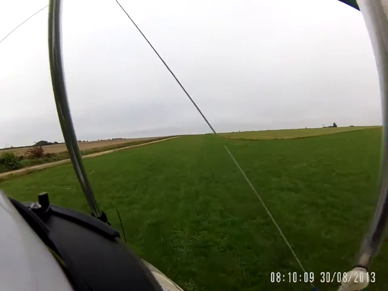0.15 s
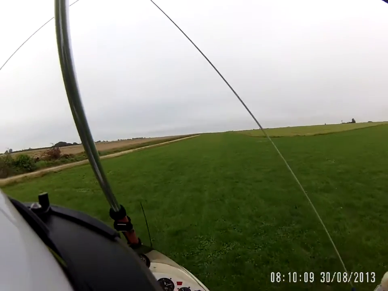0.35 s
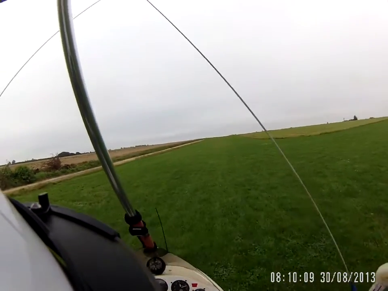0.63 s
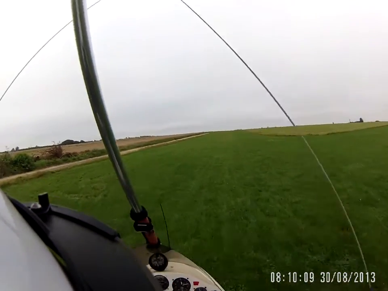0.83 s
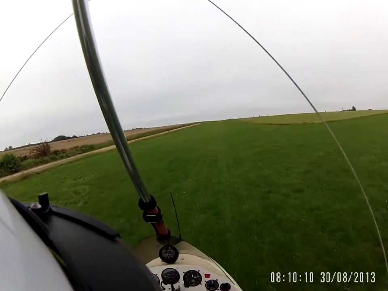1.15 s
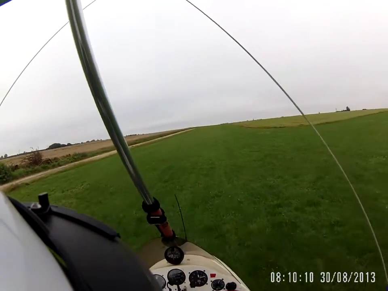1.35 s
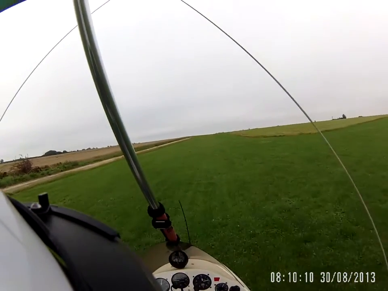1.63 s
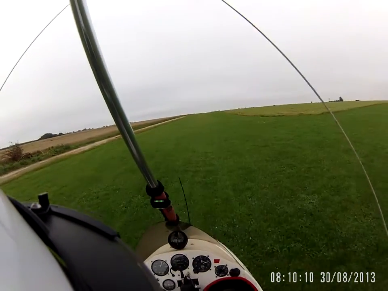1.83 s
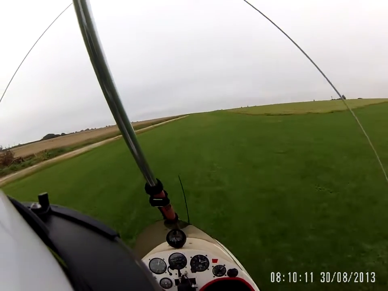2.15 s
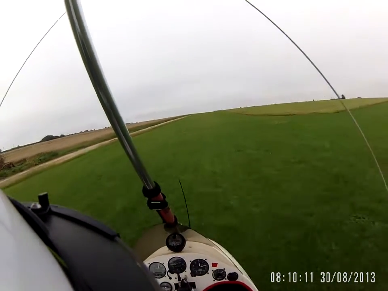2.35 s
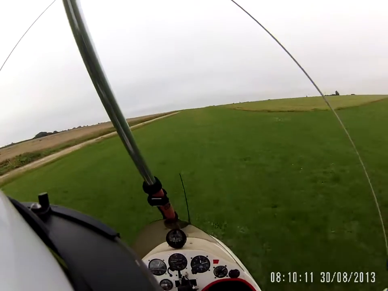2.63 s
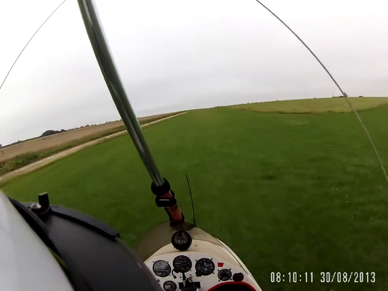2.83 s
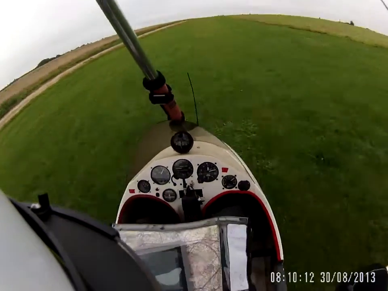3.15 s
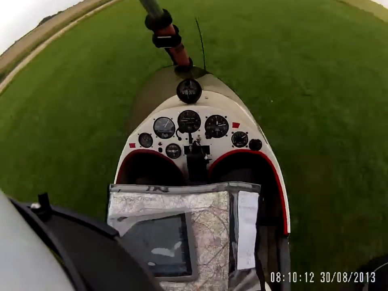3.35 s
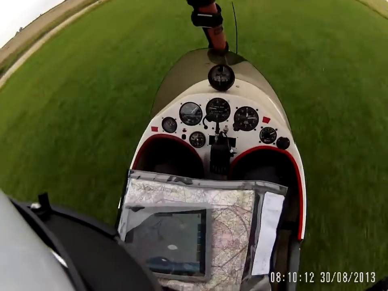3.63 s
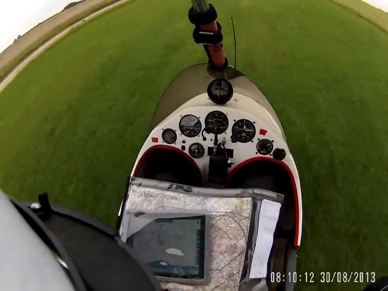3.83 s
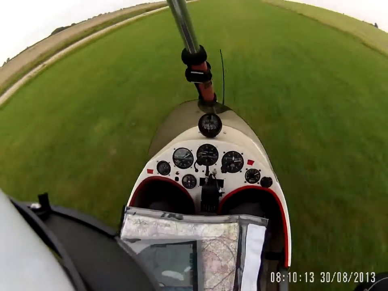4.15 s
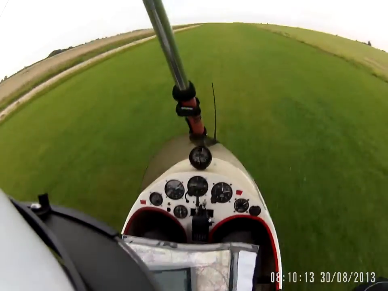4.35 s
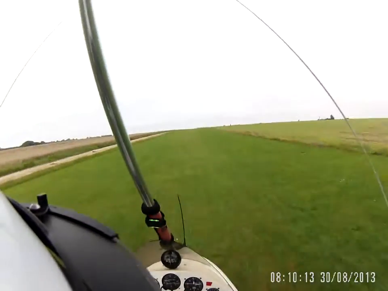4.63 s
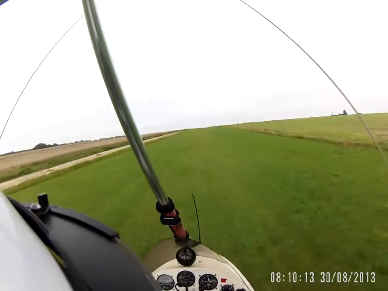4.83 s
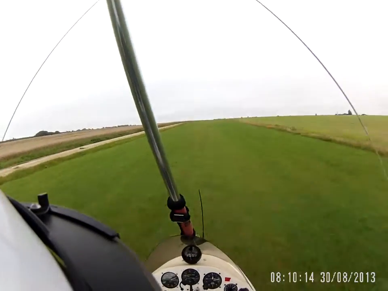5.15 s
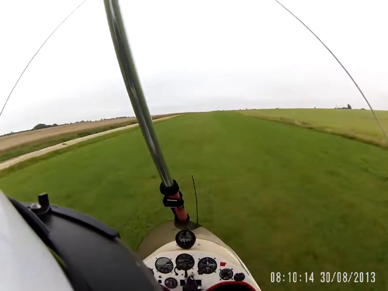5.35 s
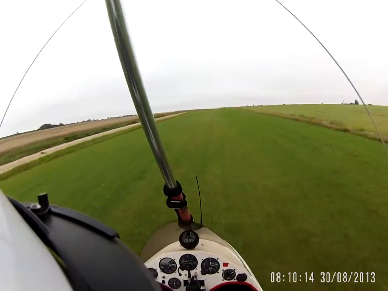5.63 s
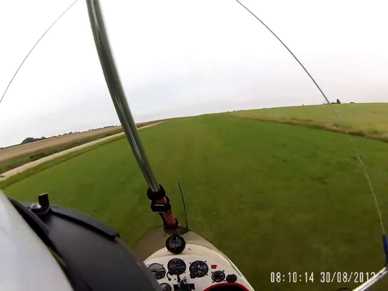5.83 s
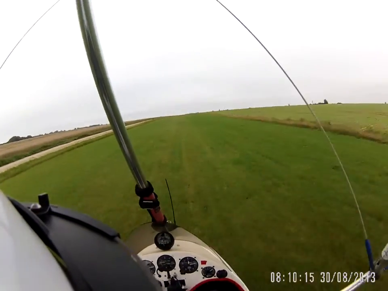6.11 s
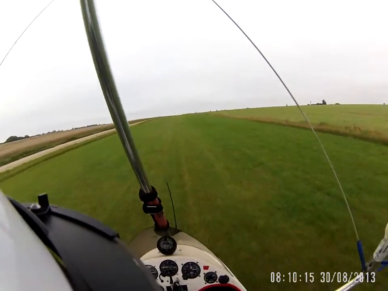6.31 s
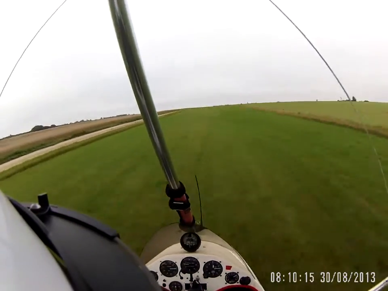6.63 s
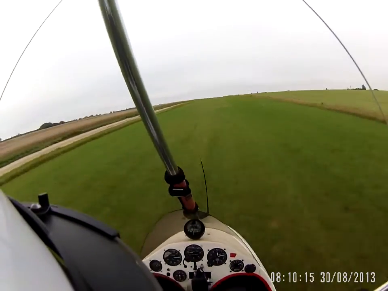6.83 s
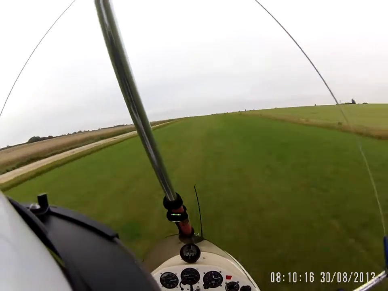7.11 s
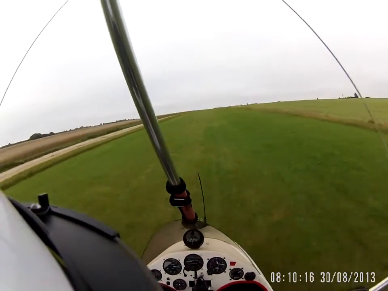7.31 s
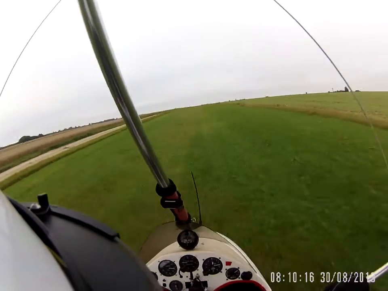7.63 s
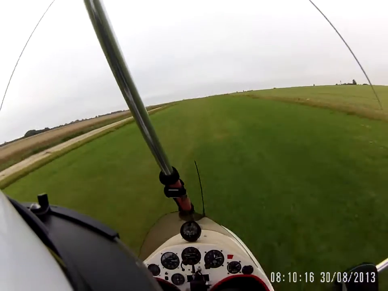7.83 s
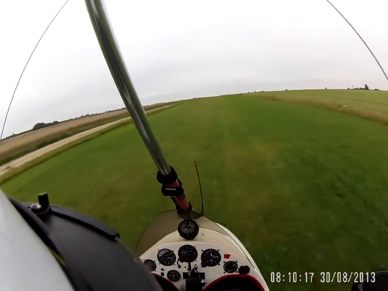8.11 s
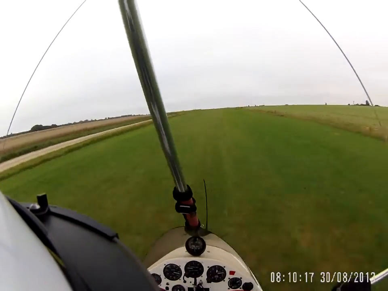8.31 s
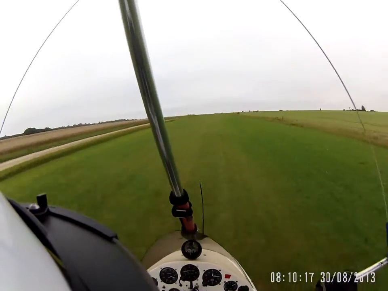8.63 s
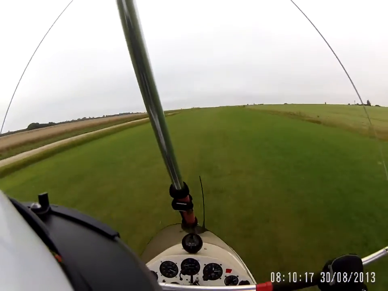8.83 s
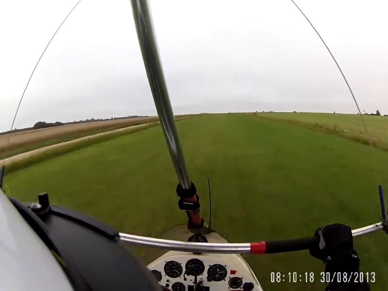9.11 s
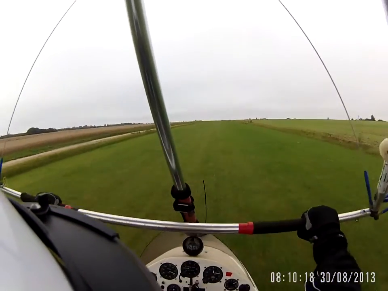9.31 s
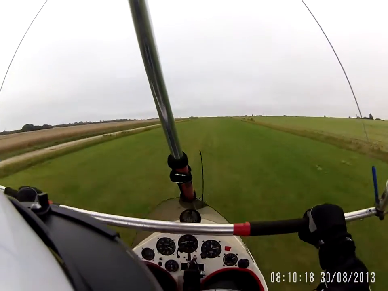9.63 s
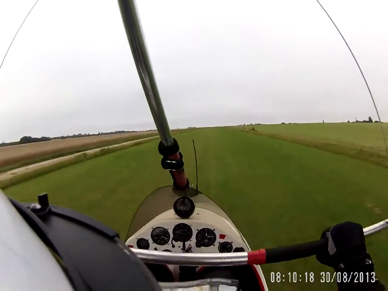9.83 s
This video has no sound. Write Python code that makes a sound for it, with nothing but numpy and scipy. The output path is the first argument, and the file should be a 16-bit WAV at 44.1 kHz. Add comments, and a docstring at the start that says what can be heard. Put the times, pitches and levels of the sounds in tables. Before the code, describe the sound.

A small two-stroke aircraft engine is heard close up from the pilot's helmet, outdoors and somewhat muffled. It runs at a fast idle for the first half second. The throttle then opens with a short bark, and pitch and loudness climb quickly, reaching full power at about 2 seconds. From there a loud, buzzing drone holds to the end at about 10 seconds, creeping only slightly higher. The propeller adds a rapid choppy flutter, a rushing wash and a light hiss, with a faint gear whine underneath. Between about 3 and 4.5 seconds the tone shifts a little, with less hiss and slightly more whine. Loose fittings give small bright ticks, one near 3 seconds and several between 6 and 8.5 seconds. From about 2 seconds, a low, gusty wind rumble builds as the aircraft gathers speed.

```python
"""A grass strip, heard from a pilot's helmet: a two-stroke twin goes from fast idle to full power.
The exhaust fires twice a turn, and a closed camera case muffles it above the low orders. A whining
gear pair drives a three-blade propeller that slaps the wake of the frame and hisses in puffs at the tips.
Frame tubes ring, loose fittings tick, and the wind rumble grows as the take-off roll gathers pace.
The balance shifts while the pilot looks down."""
import sys
import numpy as np
from scipy import signal
from scipy.fft import rfft, irfft, next_fast_len
from scipy.io import wavfile
from scipy.ndimage import uniform_filter1d, minimum_filter1d, map_coordinates

SR = 44100
rng = np.random.default_rng(int(sys.argv[2]) if len(sys.argv) > 2 else 0)


def file_out(sig):
    """Save sig as 16-bit WAV at sys.argv[1]."""
    # one column per channel
    cols = np.atleast_2d(sig).T
    # limit, then scale
    lim = np.clip(cols, -1, 1)
    pcm = np.round(lim * 32767).astype(np.int16)
    wavfile.write(sys.argv[1], SR, pcm)


N = 439236

GEAR_TEETH, PINION_TEETH, BLADE_COUNT = 59, 17, 3
IDLE_HZ, FULL_HZ = 55.5, 100  # crank speeds
ROLL_START_S = 2
CEILING, TOP_HZ = 0.9, 15270

# The rev-up. Each row: time in seconds, crank speed in Hz.
CRANK_SPEED = [(0.0, 56.6), (0.11, 55.1), (0.55, 55.94), (0.61, 56.8), (0.94, 75.92), (1.02, 79),
               (1.16, 83.8), (1.3, 88.25), (1.53, 93.66), (1.61, 95.3), (1.8, 96.55), (2.08, 97.86),
               (3.91, 99.28), (5.43, 100.4), (6.13, 101.0), (9.23, 101.6), (9.79, 101.3), (9.96, 101.4)]
# Two times in seconds: the throttle starts to open, is wide open.
THROTTLE_OPENS_S = [0.49, 1.0]
# Four times in seconds: the head starts down, is down, starts up, is up.
HEAD_DIP_S = [3.02, 3.14, 4.38, 4.62]
# Faders by layer, then by low crank order. Each row: idle level in dB, dB added by open throttle,
# by full revs and by looking down, dB added per second of the roll.
LAYER_FADERS = dict(weak=(-64, 12.5, 11, -1, -0.37), sides=(-68, 8, 5, 2, -0.18),
                beats=(-60.5, 8, 4.5, 0.5, 0.77), blade_tone=(-53, 11, 4, -0.5, .5),
                roar=(-38.5, 8.5, -1, 1.5, 0.76), rasp=(-48.5, 10, 4, -0.8, -0.17),
                hiss=(-59.5, 4.5, 11, -4.5, 0.02), edge=(-56, 5, 14, -5, -0.06),
                rumble=(-54.5, 3.5, 2.5, 0.5, 2.5), frame=(-83, 5, 18, -14, .05))
ORDER_FADERS = {2: (-38, 21, 2, .3, 0.4441), 3: (-54.5, 6, 13.5, -2, 0.4), 4: (-48, 15, 2.5, -1, 0.49),
                5: (-62.5, 28.5, 3.5, 1.5, -.1), 6: (-48, 23.5, 2, -1.5, -0.09), 7: (-58, 3.5, 30, 5, 0.4),
                8: (-53.5, 13, 3, -9, -14)}

# Tone colours. Each row: frequency in Hz, relative gain in dB.
RUMBLE_EQ = [(15, -32), (25, -1), (50, 4), (80, 5.5), (130, 2.5), (170, 5), (230, -17), (300, -43)]  # wind on the helmet
CHATTER_EQ = [(2300, -40), (2800, 0), (3400, -2), (4200, -2), (5000, -4), (6200, -30)]  # a loose fitting
ROAR_EQ = [(40, -50), (110, -6), (200, 1.5), (330, 3), (450, -2.5), (560, -13.5), (700, -7.5),
           (1000, -14.5), (1300, -46.5)]  # body of the gas and propeller wash
RASP_EQ = [(800, 0.5), (1000, -7), (1200, -4), (1350, 4), (1550, -7.5), (1900, -7), (2200, -11.5),
           (2700, -19), (3200, -41)]  # their midrange grit
SWISH_EQ = [(1410, -30), (2400, -12.5), (2740, -4), (3220, -1.5), (3550, -3.5), (3820, -2), (4400, -3.5),
            (4890, 3), (5700, -4), (6070, 0.5), (7200, -8), (9360, -39), (15800, -120)]  # body of the tip hiss
SIZZLE_EQ = [(4240, -61), (7200, -9.5), (7780, -2), (8530, -3), (9310, 3.5), (9960, 4), (11200, 1),
             (11900, 1), (12500, -2.5), (13000, -6), (13400, -5), (13900, -17), (14500, -29), (15200, -39)]  # top of the tip hiss, and the ticks
SLAP_EQ = [(20, -61), (110, -23), (190, -5.5), (260, -1), (340, -4.5), (430, 3), (520, -2.5), (600, -9),
           (690, -9), (800, -13.5), (950, -21), (1100, -20.5), (1300, -33), (3000, -56), (9000, -83)]  # a blade hitting the wake
CASE_EQ = [(50, -20), (330, 25), (440, 21), (500, 13), (560, 13), (680, -3.5), (1000, -2.5), (1500, -19),
           (2000, -26), (2700, -16)]  # what the closed case lets through
PIPE_EQ = [(105, -5), (150, -2.5), (200, 2), (250, -3.5), (272, 5), (292, 14), (320, 5.5), (345, -1.5),
           (372, -4.5), (400, 5), (435, 7), (470, 9.5), (500, 5.5), (530, 3.5), (560, 7), (600, 2.5),
           (640, -5), (800, -35)]  # resonances the low orders climb through

# Level rides. Each row: time in seconds, added level in dB.
GUSTS = [(0, -4), (1.05, .5), (1.3, -8), (2, 3), (3.4, -3), (3.7, 6), (4, 1.5), (5, 4), (5.2, 0), (5.5, 5),
         (6.2, 5), (7.6, 0.5), (8.2, 1.5), (8.7, -2), (9.3, 1), (9.96, -5)]  # gusts and lulls in the rumble
HISS_SWELLS = [(0, 0), (1.5, 2), (2.9, 0.3), (4.6, 0.5), (6.3, -0.5), (7.8, -3), (8.6, -2), (9.4, -5),
               (9.96, -5.5)]  # the tip hiss swells and fades
SLAP_FLARES = [(1.66, -2.5), (2.12, 2), (2.2, 2.5), (2.32, 8), (2.41, 1), (2.5, 3.5), (2.62, 0), (3.11, 7)]  # peaks of brief flares in the blade slap
THROTTLE_BARK = [(.52, -7), (.6, 13.5), (.8, 12.5), (.95, -12.5)]  # orders 7 and 8 bark as the throttle opens

# Rings of the metal frame. Each row: pitch in Hz, width in Hz, relative level in dB.
FRAME_RINGS = [(3130, 35, -3), (3250, 35, 0), (3830, 45, -5), (4250, 35, -6), (6060, 70, -2)]
# Loose fittings. Each row: start in seconds, relative level in dB.
TICK_CUES = [(0.2428, -26), (0.3718, -30), (0.5576, -23), (0.688, -40), (1.434, -17), (2.9981, -10),
             (6.379, -10), (6.5168, -13), (6.6911, -6), (7.214, -11), (7.7022, -11), (8.0265, -14),
             (8.485, -15)]
CHATTER_CUES = [(5.82, -46), (6.08, -49), (6.21, -54), (8.98, -46)]
# Gear whine. Each row: time in seconds, level in dB.
WHINE_RIDE = [(0, -59), (.5, -56.5), (.85, -68), (1.7, -49), (2, -48), (2.95, -47.5), (3.15, -40.5),
              (4.4, -41.5), (4.65, -54), (5, -45), (5.6, -55), (7.1, -46.5), (9.3, -54), (9.96, -45)]
# Gear sidebands: offsets from the whine in blade rates, then their relative levels in dB.
SIDEBANDS = [-2, -1, 1, 2, 3, 4]
SIDEBAND_DB = [0.5, 4, 1, -1, -12.5, -1.5]
# Relative puff strength in dB, one for each blade tip.
TIP_PUFF_DB = [5.3, -1.2, -19]
# Propeller. Each row: time in seconds, slap level before flares in dB, second harmonic level in dB.
PROPELLER_RIDE = [(0, -34.5, -55), (.6, -46.5, -60), (1, -21.5, -42), (1.5, -20, -33), (2.6, -21.5, -26.5),
                  (3.3, -26.5, -39), (4.3, -23, -32), (6.3, -27.5, -42), (7.7, -24.5, -32),
                  (8.5, -27.5, -45), (9.96, -30, -34)]
# Two low orders trade strength. Each row: time in seconds, dB added to order 4, dB added to order 5.
ORDER_TRADE = [(4.4, 0, 0), (5.6, 1, -3), (7, 1.5, -3.5), (8.3, .3, -2.5), (9.2, 3, 2.5), (9.96, -2, -2)]
# Exhaust overtones. Each row: time in seconds, levels of orders 10, 13 and 26 in dB.
UPPER_ORDER_RIDE = [(0, -45, -68, -74), (.55, -44, -65, -72), (.75, -52, -54, -80), (1.05, -40, -61, -72),
                    (1.5, -48, -57, -70), (3.3, -46, -60, -66.5), (3.8, -48, -61, -64),
                    (4.3, -47, -52, -53), (4.8, -48, -60, -65), (5.5, -54, -54, -69), (7.7, -54, -44, -68),
                    (9.198, -52, -53, -67), (9.96, -53, -61, -71)]
# Faint exhaust overtones: crank orders, then their relative levels in dB.
WEAK_ORDERS = [1, 9, 11, 12, 14, 15, 16, 18, 19, 20, 21, 22, 23, 24, 25]
WEAK_ORDER_DB = [-5, 1, -2.5, 1.5, 0.5, -7, -23, -11, -13, -19, 0.5, 3, -1.5, 1.5, -7]
# Faint in-between tones. Each row: crank order, blade rates added. Then their relative levels in dB.
BETWEEN_TONES = [(3, -1), (4, -1), (5, -1), (5, 1)]
BETWEEN_DB = [0, 3.5, -5, 4]
# Level sway in dB for each low crank order.
ORDER_SWAY_DB = {2: 0.25, 3: 0.72, 4: 0.33, 5: 0.97, 6: 0.79, 7: 2.3, 8: 1.6}


def amp(db):
    return 10 ** (np.asarray(db) / 20)


def unit_rms(x):
    return x / np.sqrt(np.mean(x ** 2) + 1e-20)


def eq_db(eq, hz):
    """The gain of an EQ curve at hz, read on a log frequency axis."""
    freqs, gains = np.transpose(eq)
    return np.interp(np.log(hz + 1), np.log(freqs + 1), gains)


def rides(rows):
    """One automation curve for each column after the time."""
    times, *columns = np.transpose(rows)
    return [np.interp(np.arange(N) / SR, times, column) for column in columns]


def wobble(rate):
    """A gliding random curve, rate knots a second."""
    knots = rng.standard_normal(int(N * rate / SR) + 4)
    return map_coordinates(knots, [np.arange(N) * rate / SR], order=1)


def coloured(x, eq):
    """x through an EQ curve, brought to rms 1."""
    size = next_fast_len(N + SR // 4)
    gain = amp(eq_db(eq, np.fft.rfftfreq(size, 1 / SR)))
    return unit_rms(irfft(rfft(x, size) * gain, size)[:N])


def patchy_noise(depth_db):
    """White noise with louder and softer patches in time and frequency."""
    spectra = signal.stft(rng.standard_normal(N + 512), nperseg=512)[2]
    patches = uniform_filter1d(rng.standard_normal(spectra.shape), 6, axis=0)
    patches = uniform_filter1d(patches, 8, axis=1)
    return signal.istft(spectra * amp(depth_db * unit_rms(patches)), nperseg=512)[1][:N]


def tone(turns, db, sway_db=1.8, drift_rad=0.4, rate=6):
    """A sine around rms level db, wandering in level and phase."""
    peak = np.sqrt(2) * amp(db + sway_db * wobble(rate))
    return peak * np.sin(2 * np.pi * turns + drift_rad * wobble(rate))


def wind(db):
    """The low bed: wind buffets the helmet in gusts and lulls."""
    buffeting = amp(1.5 * wobble(14)) * rng.standard_normal(N)
    return amp(db + rides(GUSTS)[0]) * coloured(buffeting, RUMBLE_EQ)


def frame_ring(ring_db):
    """The shaken tubes ring in narrow bands that fade in and out."""
    size = next_fast_len(N)
    freqs = np.fft.rfftfreq(size, 1 / SR)
    shake = rfft(rng.standard_normal(N), size)
    rings = np.zeros(N)
    for hz, width, db in FRAME_RINGS:
        resonance = width ** 2 / (width ** 2 + (2 * (freqs - hz)) ** 2)
        rings += amp(ring_db + db + 2.2 * wobble(6)) * unit_rms(irfft(shake * resonance, size)[:N])
    return rings


def rattle():
    """Loose fittings give short bright ticks and longer bursts of chatter."""
    tick_env, chatter_env = np.zeros((2, N + SR))
    t = np.arange(SR // 10) / SR
    tick = (1 - np.exp(-t / 0.00051)) * amp(-9.5 - 60 * t / 0.011)  # dies 60 dB in 11 ms
    burst = np.sin(np.pi * t / 0.12)
    for start, db in TICK_CUES:
        tick_env[round(start * SR):][:len(t)] = amp(db) * tick
    for start, db in CHATTER_CUES:
        chatter_env[round(start * SR):][:len(t)] = amp(db) * burst
    ticks = tick_env[:N] * coloured(rng.standard_normal(N), SIZZLE_EQ)
    return ticks + chatter_env[:N] * coloured(rng.standard_normal(N), CHATTER_EQ)


def wash(crank, roar_db, rasp_db):
    """Rushing gas and propeller wash: a smooth roar, and a rasp that pulses lightly with each firing."""
    roar = coloured(rng.standard_normal(N), ROAR_EQ)
    rasp = coloured(amp(0.5 * np.cos(4 * np.pi * crank)) * patchy_noise(depth_db=1), RASP_EQ)
    return amp(roar_db) * roar + amp(rasp_db) * rasp


def tip_hiss(crank, blades, swish_db, sizzle_db):
    """Each passing blade tip adds a puff to a steady hiss; the top end puffs hardest."""
    passes = blades.astype(int)
    scatter_db = 1.1 * rng.standard_normal(passes[-1] + 1)
    puff_db = np.array(TIP_PUFF_DB)[passes % BLADE_COUNT] + scatter_db[passes]
    puffs = amp(puff_db) * np.sin(np.pi * blades) ** 4
    jet = amp(0.7 * np.cos(4 * np.pi * crank)) * patchy_noise(depth_db=0.7)
    swish = amp(swish_db) * coloured((4.46 + puffs) * jet, SWISH_EQ)
    sizzle = amp(sizzle_db + 0.32 * wobble(32)) * coloured((2.46 + puffs) * jet, SIZZLE_EQ)
    return amp(rides(HISS_SWELLS)[0]) * (swish + sizzle)


def gearbox(crank, blades, sideband_db):
    """Meshing teeth whine; the pulsing blade load spreads sidebands around the note."""
    mesh = PINION_TEETH * crank
    sidebands = sum(tone(mesh + offset * blades, sideband_db + db, sway_db=4, drift_rad=1)
                    for offset, db in zip(SIDEBANDS, SIDEBAND_DB))
    return sidebands + tone(mesh, rides(WHINE_RIDE)[0], sway_db=0.6, drift_rad=0.25, rate=8)


def propeller(blades, hum_db, flare_db):
    """Over a hum, each blade slaps the wake of the frame; eddies sway the slaps in force and timing."""
    slap_db, second_db = rides(PROPELLER_RIDE)
    passes = np.searchsorted(blades, np.arange(1, int(blades[-1])))
    time_jitter, force_jitter = rng.standard_normal((len(passes), 2)).T
    late_s = 0.00017 * time_jitter + 0.00027 * wobble(22)[passes]
    force_db = 2.9 * force_jitter + 2.8 * wobble(16)[passes]
    hits = np.clip(passes + np.round(late_s * SR).astype(int), 0, N - 1)
    slaps = coloured(np.bincount(hits, amp(force_db), N), SLAP_EQ)
    hum = tone(blades, hum_db, sway_db=1.2, drift_rad=0.24, rate=6.1)
    hum += tone(2 * blades, second_db, sway_db=1.5, drift_rad=0.58, rate=8)
    return amp(slap_db + flare_db) * slaps + hum


def exhaust_buzz(crank_hz, crank, blades, weak_db, between_db):
    """Exhaust overtones pass the case unevenly; faint tones sit one blade rate off orders 3 to 5."""
    upper = sum(tone(order * crank, db) for order, db in zip((10, 13, 26), rides(UPPER_ORDER_RIDE)))
    weak = sum(tone(order * crank, weak_db + db + eq_db(CASE_EQ, order * crank_hz))
               for order, db in zip(WEAK_ORDERS, WEAK_ORDER_DB))
    between = sum(tone(order * crank + offset * blades, between_db + db)
                  for (order, offset), db in zip(BETWEEN_TONES, BETWEEN_DB))
    return upper + weak + between


def exhaust_drone(crank_hz, crank, drive, flare_db):
    """Two firings a turn: clean low orders climb through the pipe's resonances as the revs rise."""
    fourth_db, fifth_db = rides(ORDER_TRADE)
    bark_db = rides(THROTTLE_BARK)[0]
    duck_db = -0.53 * flare_db  # order 6 ducks when the slaps flare
    added_db = {4: fourth_db, 5: fifth_db, 6: duck_db, 7: bark_db, 8: bark_db}
    drone = np.zeros(N)
    for order, fader in ORDER_FADERS.items():
        db = np.dot(fader, drive) + eq_db(PIPE_EQ, order * crank_hz) + added_db.get(order, 0)
        lead = order % 2 / 4  # odd orders come from the unequal cylinders, a quarter cycle ahead
        drone += tone(order * crank + lead, db, sway_db=ORDER_SWAY_DB[order], drift_rad=0.13, rate=14)
    return drone


def scene():
    """One crank times the engine and propeller; throttle, revs, head and roll move the faders."""
    t = np.arange(N) / SR
    crank_hz = uniform_filter1d(rides(CRANK_SPEED)[0], size=SR // 12)  # the flywheel rounds each change
    crank = np.cumsum(crank_hz) / SR  # turns so far
    blades = crank * BLADE_COUNT * PINION_TEETH / GEAR_TEETH  # blade passes so far
    throttle = np.interp(t, THROTTLE_OPENS_S, [0, 1])
    revs = (crank_hz - IDLE_HZ) / (FULL_HZ - IDLE_HZ)
    head_down = np.interp(t, HEAD_DIP_S, [0, 1, 1, 0])
    rolling_s = np.maximum(t - ROLL_START_S, 0)
    drive = np.array([np.ones(N), throttle, revs, head_down, rolling_s])
    level = {name: np.dot(fader, drive) for name, fader in LAYER_FADERS.items()}
    flare_db = sum(db * np.exp(-((t - peak_s) / 0.033) ** 2) for peak_s, db in SLAP_FLARES)
    mix = exhaust_drone(crank_hz, crank, drive, flare_db)
    mix += exhaust_buzz(crank_hz, crank, blades, level["weak"], level["beats"])
    mix += gearbox(crank, blades, level["sides"])
    mix += propeller(blades, level["blade_tone"], flare_db)
    mix += wind(level["rumble"]) + wash(crank, level["roar"], level["rasp"])
    mix += tip_hiss(crank, blades, level["hiss"], level["edge"])
    mix += frame_ring(level["frame"]) + rattle()
    return mix[None]


def record(dry):
    """A limiter eases the tallest peaks down, then everything above TOP_HZ is cut."""
    needed = np.minimum(1, CEILING / (np.abs(dry) + 1e-9))
    gain = uniform_filter1d(minimum_filter1d(needed, size=265), size=132)
    size = next_fast_len(N + SR // 4)
    passband = np.fft.rfftfreq(size, 1 / SR) < TOP_HZ
    return irfft(rfft(dry * gain, size) * passband, size)[:, :N]


dry = scene()
out = record(dry)
file_out(out)
```